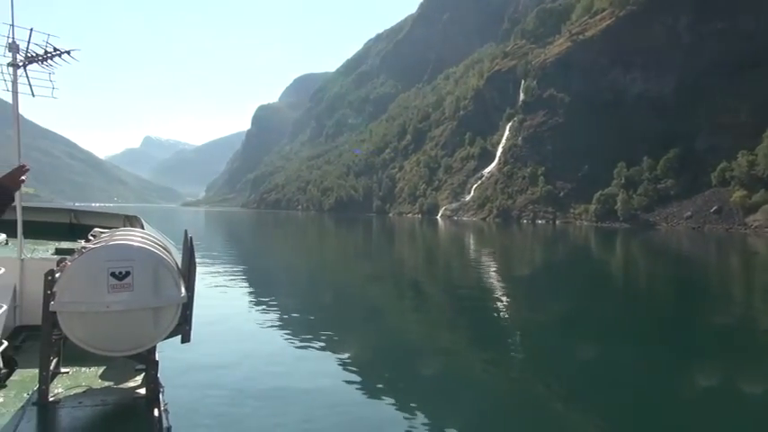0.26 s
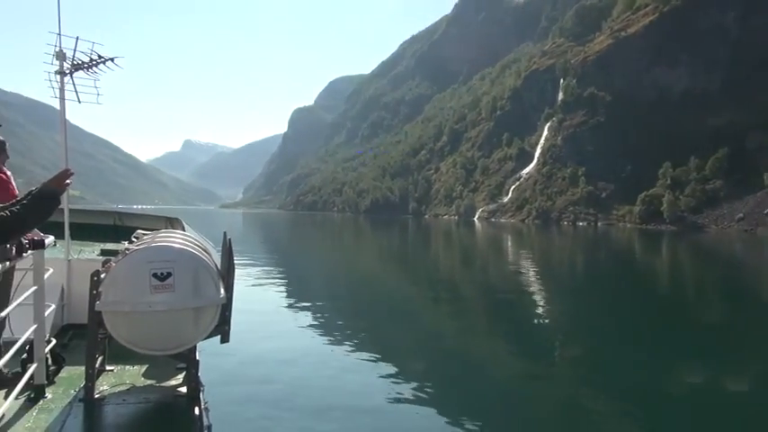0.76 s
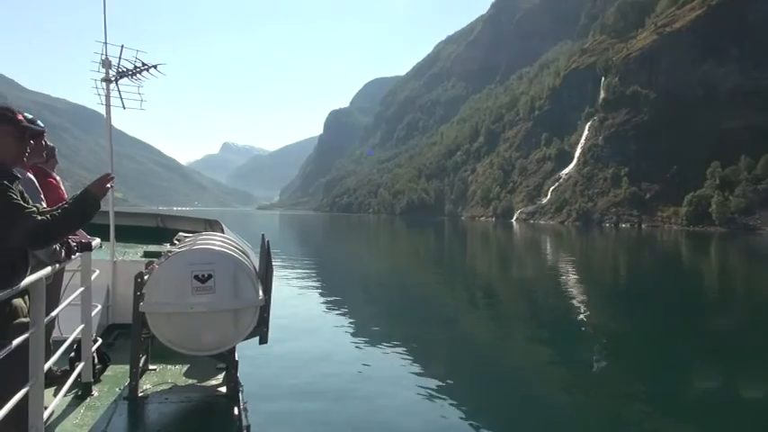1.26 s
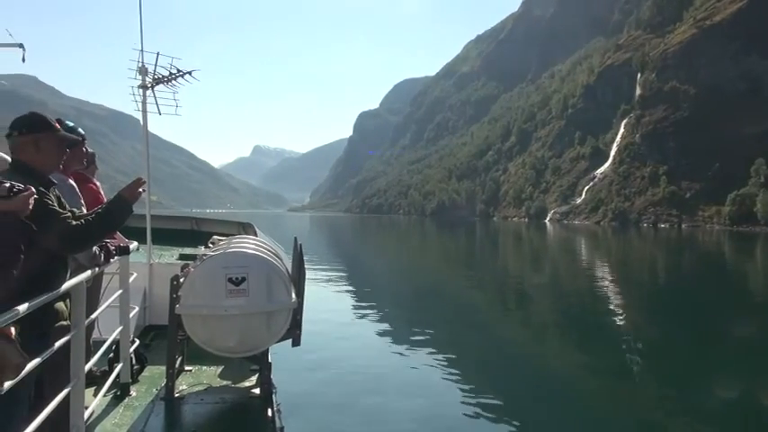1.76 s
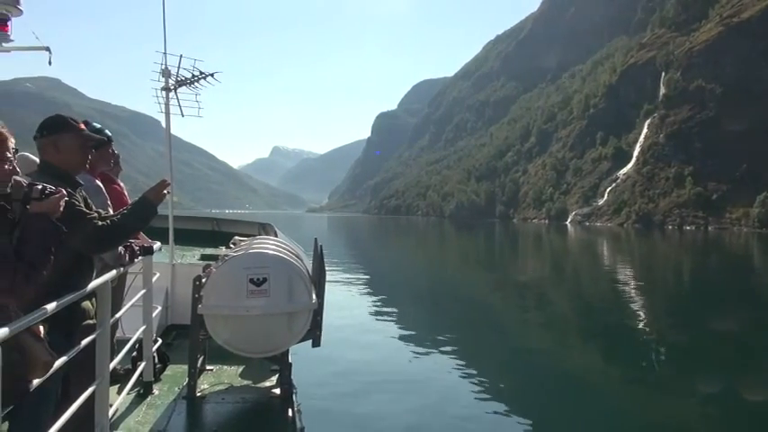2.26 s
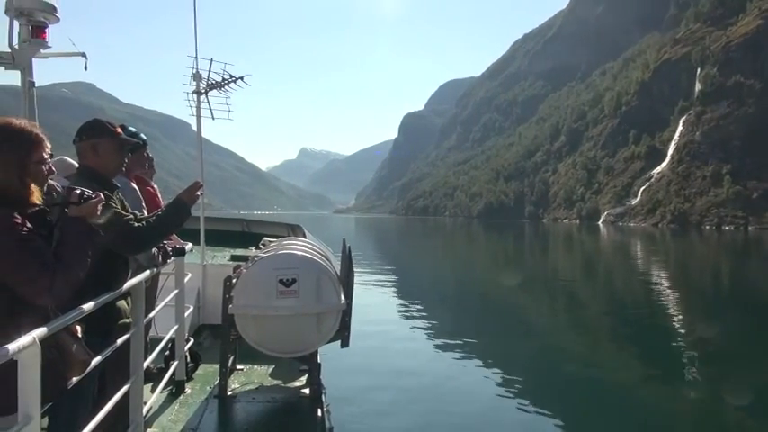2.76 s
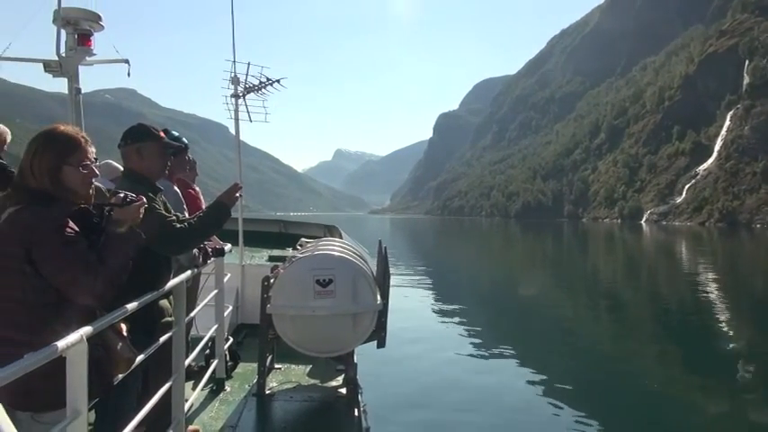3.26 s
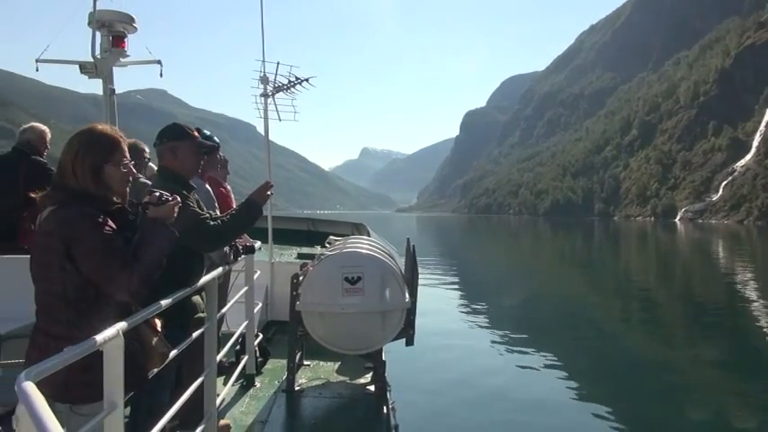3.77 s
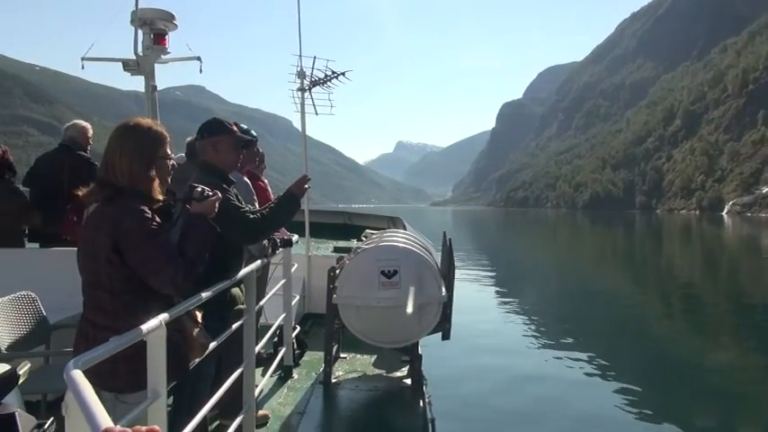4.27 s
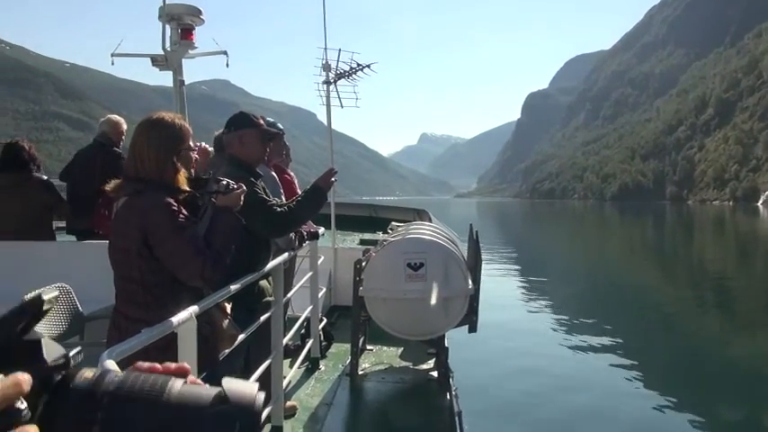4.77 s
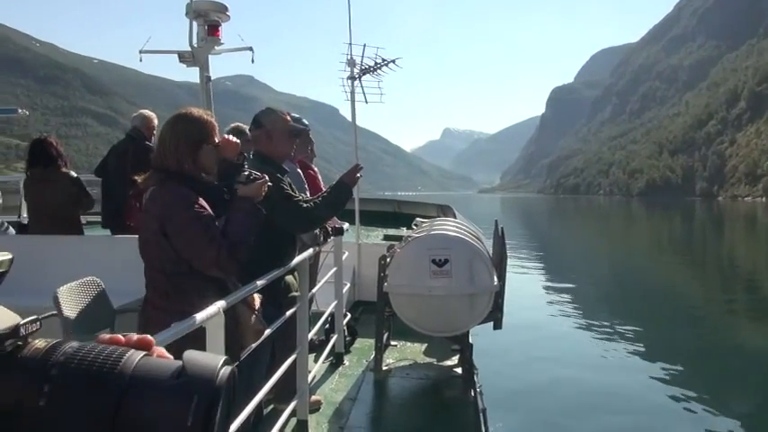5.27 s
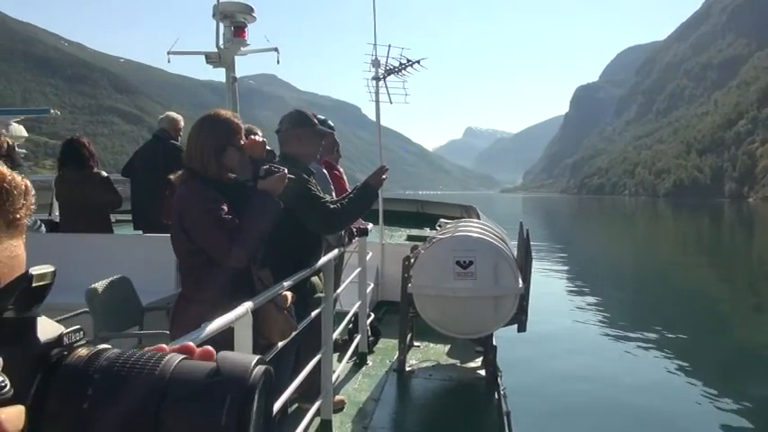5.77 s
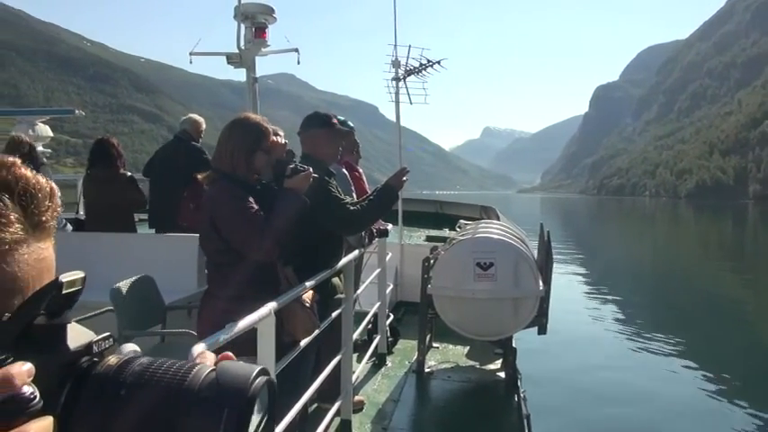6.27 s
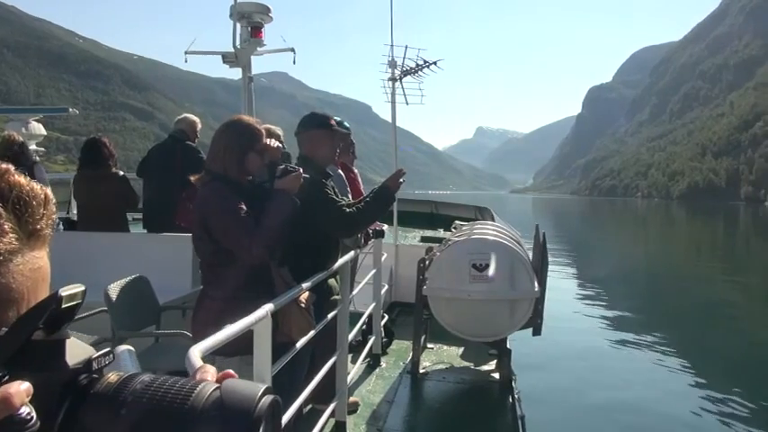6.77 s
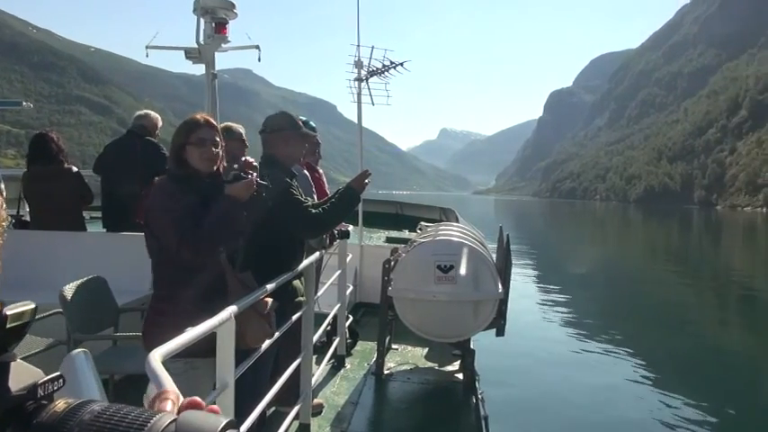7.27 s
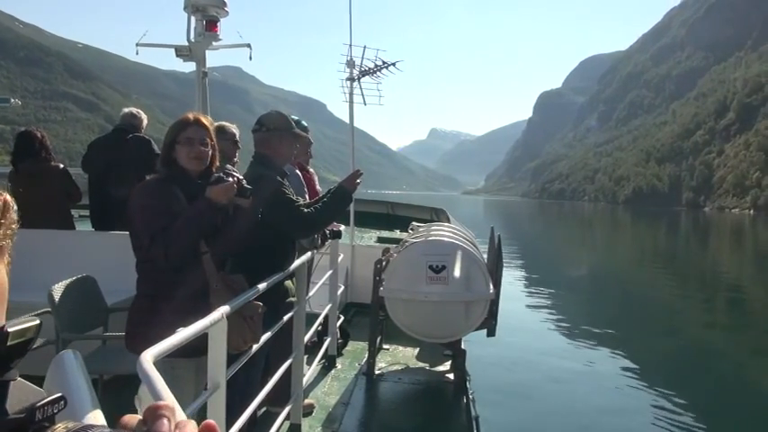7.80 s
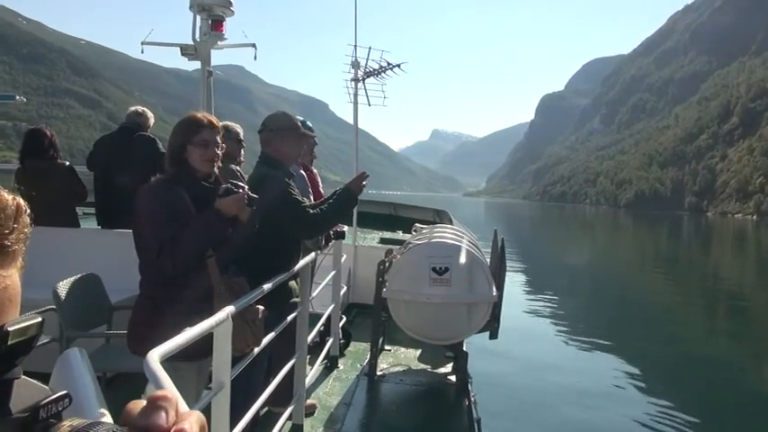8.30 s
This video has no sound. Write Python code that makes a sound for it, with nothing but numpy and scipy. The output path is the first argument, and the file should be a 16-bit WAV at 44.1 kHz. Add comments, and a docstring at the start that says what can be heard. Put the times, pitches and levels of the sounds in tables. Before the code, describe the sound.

A constant low engine hum dominates, its pitch unchanging, with rapid soft throbbing and a rough growl above. Beneath lies uneven rumble and the boom of steel deck plates. Water laps and hisses along the hull, strongest at the very start, and air pockets gurgle now and then, more often in the later part. A thin metallic buzz flickers on the left, fading past midway. Close, wide stereo pickup outdoors on deck.

```python
"""On a calm fjord, at the rail of a cruising sightseeing boat's open deck.
The diesel exhaust drones at a steady speed: tones on multiples of the shaft speed, throbbing five times a second.
Shaped noise makes the low rumble under it, and a loose fitting, rung by tiny contacts, buzzes with each turn.
The bow wave washes along the hull as noise in wavering bands, and gurgles in short rising tones."""
import sys
import numpy as np
from scipy import signal
from scipy.fft import rfft, irfft
from scipy.io import wavfile
from scipy.ndimage import uniform_filter1d, minimum_filter1d

SR = 44100
rng = np.random.default_rng(int(sys.argv[2]) if len(sys.argv) > 2 else 0)


def transcribe(u):
    """Save the signal u as a 16-bit wav file named by the first command-line argument.

    u: samples, shape (n,) or (channels, n), limited to [-1, 1]; the rate is SR.
    q: integer samples, one column per channel.
    """
    v = np.clip(np.atleast_2d(u).T, -1, 1)
    q = np.round(v * 32767).astype(np.int16)
    wavfile.write(sys.argv[1], SR, q)


N = 376610
TIME = np.arange(N) / SR
FREQS = np.maximum(np.arange(N // 2 + 1) * SR / N, 1)
SHAFT_HZ = 29.867

# balance between the two sides: (frequency [Hz], left minus right [dB])
BALANCE = [(30, .8), (60, -3), (120, 3), (150, -2), (180, 7.5), (215, 11), (290, 5), (380, 11.5),
           (490, 7.5), (760, 4.5), (1300, 6), (3000, 3.5), (6300, -3), (10000, 0)]
# phase between the two sides: (frequency [Hz], lead of the left [rad])
LEFT_LEAD = [(60, 0), (200, 0.17), (1000, 0.39), (1700, 0.77), (2400, 0.73), (3300, 0.78), (4000, 0.019),
             (8000, 0)]


def from_db(db):
    """Decibels to gain."""
    return 10 ** (np.asarray(db) / 20)


def rms_one(x):
    """Scale to unit power."""
    return x / np.sqrt(np.mean(x ** 2) + 1e-20)


def in_time(rows):
    """Each column of a curve, at every sample."""
    s, *columns = np.transpose(rows)
    return [np.interp(TIME, s, column) for column in columns]


def at_hz(points, hz):
    """Read a table on a log-frequency axis."""
    table_hz, values = np.transpose(points)
    return np.interp(np.log(hz), np.log(table_hz), values)


def drift(rate_hz):
    """Slow chance with a spread of one: noise through a two-pole lowpass, drawn every 40 samples."""
    pole = np.exp(-2 * np.pi * rate_hz * 40 / SR)
    noise = rng.standard_normal(N // 40 + 2002)
    slow = signal.lfilter([1], [1, -2 * pole, pole * pole], noise)[2000:]  # drop the settling
    return np.interp(np.arange(N) / 40, np.arange(len(slow)), rms_one(slow))


def pan(balance_db):
    """Left and right gains whose mean is one."""
    gains = from_db(np.array([[.5], [-.5]]) * balance_db)
    return gains / gains.mean(axis=0)


def resonate(x, hz, width_hz):
    """One resonance with unit gain on top."""
    r = np.exp(-np.pi * width_hz / SR)
    top = np.array([1, 0, -1]) * (1 - r * r) / 2
    return signal.lfilter(top, [1, -2 * r * np.cos(2 * np.pi * hz / SR), r * r], x)


def stereo_noise(spectrum):
    """Noise of a given density, left-right likeness set by frequency: wide from 5 to 11 kHz, nearly mono above."""
    # how alike the two sides are: (frequency [Hz], left-right likeness [-1 to 1])
    likeness = [(30, .97), (150, 0.71), (320, 0.59), (450, 0.78), (700, 1), (2000, 0.83), (4600, 0.97),
                (5500, 0.2), (8000, 0.11), (10800, 0), (11500, .99)]
    mid, side = rfft(rng.standard_normal((2, N))) * np.sqrt(SR / 4)
    alike = np.clip(at_hz(likeness, FREQS), -1, 1)
    pair = np.sqrt(1 + alike) * mid + np.sqrt(1 - alike) * side * [[1], [-1]]
    # steep fall outside the table
    low_hz, high_hz = spectrum[0][0], spectrum[-1][0] * 2
    ends = 1 / np.sqrt((1 + (low_hz / FREQS) ** 8) * (1 + (FREQS / high_hz) ** 8))
    lead = np.exp(1j * at_hz(LEFT_LEAD, FREQS) * [[.5], [-.5]])
    placing = pan(at_hz(BALANCE, FREQS)) * lead
    return irfft(pair * ends * from_db(at_hz(spectrum, FREQS)) * placing, N)


def shaft_lines(angle, orders, path, waver_db, rough):
    """Wavering tones in step with the shaft; half multiples make every second turn differ."""
    out = np.zeros((2, N))
    for multiple, db in orders:
        multiple = np.round(2 * multiple) / 2      # a four-stroke cycle takes two turns
        hz = multiple * SHAFT_HZ
        lead = at_hz(LEFT_LEAD, hz) * np.array([[.5], [-.5]])
        phase = multiple * angle - path(hz) + rough * drift(12) + lead
        level_db = db + waver_db * drift(8.4)
        out += np.sin(phase) * from_db(level_db) * pan(at_hz(BALANCE, hz))
    return np.sqrt(2) * out


def through_pipe(hz):
    """Phase lag of the exhaust pipe: tones above its resonance leave late."""
    pipe_hz, pipe_q = 150, 2.2
    return np.arctan(pipe_q * (hz / pipe_hz - pipe_hz / hz))


def through_hull(hz):
    """Phase lag of the longer path by way of the hull, which lands between two exhaust pulses."""
    delay_s = .0194
    return 2 * np.pi * hz * delay_s


def throb(uneven_db):
    """Swing of the boom in dB: a broad swell with a quicker ripple at twice its rate, a little uneven."""
    turns_per_throb = 6      # probably with the geared-down propeller
    swell_db, swell_crest_s = 0.62, .005
    ripple_db, ripple_crest_s = .5, 0.052
    rate = 2 * np.pi * SHAFT_HZ / turns_per_throb      # rad/s
    swell = swell_db * np.cos(rate * (TIME - swell_crest_s))
    ripple = ripple_db * np.cos(2 * rate * (TIME - ripple_crest_s))
    return swell + ripple + uneven_db * drift(6)


def exhaust_boom(angle):
    """The fourth order of the exhaust and its weaker neighbours throb as one deep boom."""
    # boom, easing as the microphone turns toward the deck: (time [s], level before throb and trim [dB])
    boom_curve = [(0.0, -12.5), (0.7, -14.5), (5.0, -14), (6.4, -16), (7.8, -15.5), (8.54, -17.5)]
    # exhaust tones: (multiple of the shaft speed, level re the boom [dB])
    boom_orders = [(1, -27), (2, -24), (3, -42), (4, -0.5)]
    boom_db, = in_time(boom_curve)
    lines = shaft_lines(angle, boom_orders, through_pipe, waver_db=0.15, rough=0.062)
    return from_db(boom_db + throb(uneven_db=0.04) + 0.56) * lines


def growl_level():
    """Level in dB shared by the exhaust growl and the hull, as the load wavers a little."""
    # growl of the higher orders: (time [s], level before waver and trims [dB])
    growl_curve = [(0.0, -15), (1.2, -18), (1.6, -15), (3.1, -16.5), (4.0, -14), (4.9, -14.5), (5.7, -15.5),
                   (6.1, -14.5), (6.5, -16), (7.8, -14.8), (8.54, -17.2)]
    growl_db, = in_time(growl_curve)
    return growl_db + 0.44 * drift(5.3)


def exhaust_growl(angle, growl_db):
    """Higher exhaust orders growl, flickering because no two firings are equally strong."""
    # exhaust tones: (multiple of the shaft speed, level re the growl [dB])
    growl_orders = [(5, -17), (5.5, -18), (6, -1.5), (6.5, -22), (7, -3.5)]
    stroke_db = 0.51 * drift(26)
    lines = shaft_lines(angle, growl_orders, through_pipe, waver_db=0.1, rough=0.16)
    return from_db(growl_db + stroke_db - 0.56) * lines


def hull_hum(angle, growl_db):
    """The hull plates hum on high shaft orders, delayed by the path through the hull."""
    # hum of the plates: (multiple of the shaft speed, level re the growl before a 3 dB cut [dB])
    hull_orders = [(8, -16.5), (9, -17.5), (10, -15.5), (11, -27), (14, -34.5), (16, -28.5), (18, -30),
                   (20, -29)]
    lines = shaft_lines(angle, hull_orders, through_hull, waver_db=1.83, rough=0.22)
    return from_db(growl_db - 3.0) * lines


def combustion_rumble():
    """Uneven combustion rumbles as low shaped noise."""
    # rumble before the engine is panned: (frequency [Hz], density [dB per Hz])
    rumble_spectrum = [(6, -63), (45, -58.5), (72, -53.5), (105, -43.5), (135, -46.5), (170, -44.5),
                       (225, -49), (255, -51.5), (300, -56.5), (360, -64.5), (500, -76.5)]
    return stereo_noise(rumble_spectrum)


def deck_plates(level_db):
    """The engine's rumble sets the steel deck booming: noise in one broad resonance, passed twice."""
    # resonance of the plates: (frequency [Hz], width of each pass [Hz])
    plate = (319.4, 41)
    hz, width_hz = plate
    noise = rng.standard_normal(N)
    ring = rms_one(resonate(resonate(noise, hz, width_hz), hz, width_hz))
    return ring * from_db(level_db) * pan(at_hz(BALANCE, hz))


def engine(angle):
    """Exhaust, hull and deck together, as the microphone turns slowly toward the deck."""
    # the turn: (time [s], left minus right added to the whole engine [dB], deck plate level before it [dB])
    turn_curve = [(0, 0, -38), (2, 1, -36), (4, -0.5, -34.5), (6, 0.5, -34), (8.54, 0.5, -34)]
    turn_db, plate_db = in_time(turn_curve)
    growl_db = growl_level()
    tones = exhaust_boom(angle) + exhaust_growl(angle, growl_db) + hull_hum(angle, growl_db)
    return (tones + combustion_rumble() + deck_plates(plate_db)) * pan(turn_db)


def fitting_contacts(angle, per_turn_db, per_cycle_db, uneven_db, touches_per_s, lead_ms):
    """Tiny random contacts ring the fitting, hardest once per shaft turn, every second turn harder."""
    # resonances of the fitting: (frequency [Hz], width of each pass [Hz], relative level [dB])
    modes = [(1261, 92, -4), (2060, 91, 2), (2320, 164, 4), (2540, 177, 3)]
    shake_db = per_turn_db * np.cos(angle) + per_cycle_db * np.cos(angle / 2) + uneven_db * drift(32)
    touches = (rng.random(N) < touches_per_s / SR) * rng.choice([-1, 1], N)
    clicks = touches * from_db(shake_db) + 1e-18
    ring = 0
    for hz, width_hz, db in modes:
        ring = ring + from_db(db) * resonate(resonate(clicks, hz, width_hz), hz, width_hz)
    buzz = rms_one(ring)
    # it lies to the left, so the right side hears it later
    return np.array([buzz, np.interp(TIME - lead_ms / 1000, TIME, buzz)])


def loose_fitting(angle):
    """The fitting's buzz swells and fades, with brief hard shakes, left of the microphone."""
    # buzz: (time [s], level before shakes, drift and trim [dB])
    buzz_curve = [(0.0, -38), (2.5, -36), (3.2, -35), (4.35, -35.5), (4.6, -38.5), (8.54, -38.5)]
    # its hardest shakes: (time [s], extra level at the crest [dB])
    shakes = [(.333, 8), (.66, 8.5), (1.47, 4.5), (2.06, 11.5), (2.67, 6.5), (3.14, 8), (3.47, 2),
              (6.42, 9.5)]
    buzz_db, = in_time(buzz_curve)
    shakes_db = sum(db * np.exp(-.5 * ((TIME - s) / 0.005) ** 2) for s, db in shakes)
    level_db = buzz_db + shakes_db + .5 * drift(3.7) + 0.56
    buzz = fitting_contacts(angle, per_turn_db=4.0, per_cycle_db=1.5, uneven_db=1.5,
                            touches_per_s=1200, lead_ms=0.11)
    return buzz * from_db(level_db) * pan(balance_db=3.0)


def wave_levels():
    """Wash, splash and spray in dB; the splash follows the wash in part and fades as we turn from the water."""
    # bow wave, only the swing about each mean is used: (time [s], wash level [dB], spray level [dB])
    wave_curve = [(0.0, -25, -35.5), (0.3, -29, -37), (0.9, -28, -37), (1.6, -28.5, -37),
                  (2.05, -30.5, -39), (2.8, -29.5, -37.5), (3.25, -30.5, -37), (3.7, -27.5, -37),
                  (4.15, -27.5, -36), (4.9, -29.5, -37.5), (5.5, -29, -37.5), (6.1, -29.5, -37.5),
                  (6.9, -29.5, -38.5), (7.15, -27.5, -38), (7.8, -29, -38.5), (8.3, -30.5, -39.5),
                  (8.54, -29.5, -39)]
    splash_follows, splash_fade_db_per_s = .6, 0.28
    wash_db, spray_db = in_time(wave_curve)
    splash_db = splash_follows * wash_db - splash_fade_db_per_s * TIME
    return wash_db, splash_db, spray_db


def bow_wave(wash_db, splash_db, spray_db, lap_db, fizz_db):
    """Wash and splash lap in patches of pitch; the spray above them is a fine hiss that flickers faster."""
    # water on the hull, before swings and patches: (frequency [Hz], density [dB per Hz])
    wash_spectrum = [(330, -57.5), (480, -56), (590, -59.5), (700, -57.5), (1080, -65), (1500, -65),
                     (2100, -69), (3000, -71), (4400, -74), (6400, -77), (8700, -86), (10700, -87.5),
                     (12000, -87), (15000, -92)]
    rest, out = stereo_noise(wash_spectrum), 0
    for edge_hz in [420, 540, 700, 900, 1150, 1500, 1900, 3000, 4200, 6000, 8500, 11500]:
        lowpass = signal.butter(4, edge_hz, fs=SR, output="sos")
        band = signal.sosfiltfilt(lowpass, rest)
        rest = rest - band      # what lies above is left for the next bands
        level_db = wash_db if edge_hz < 1000 else splash_db if edge_hz < 2000 else spray_db
        patch_db = lap_db * drift(8) if edge_hz < 2000 else fizz_db * drift(25)
        out = out + band * from_db(level_db - level_db.mean() + patch_db)
    return out + rest * from_db(spray_db - spray_db.mean() + fizz_db * drift(27))


def gurgles(wander, rise_per_s):
    """Pockets of air folded under by the wave ring briefly, wobbling and rising in pitch."""
    # single gurgles: (time of the crest [s], pitch there before wobble [Hz], level [dB], spread [s])
    pockets = [(0.917, 980, -38, 0.058), (1.194, 452, -33, 0.05), (1.38, 495, -31.5, 0.034),
               (2.93, 756, -35, 0.024), (5.091, 620, -32, 0.042), (6.151, 410, -35, 0.046),
               (6.298, 337.3, -28.5, .03), (6.42, 462, -37, 0.06), (6.73, 816, -35, .04),
               (7.326, 936, -39, 0.062), (7.41, 536, -35, 0.033), (7.72, 845, -39, .07)]
    out, wobble = np.zeros((2, N)), wander * drift(22.7)
    for s, hz, db, spread_s in pockets:
        near = np.abs(TIME - s) < 4 * spread_s
        age = TIME[near] - s
        pitch_hz = hz * (1 + wobble[near] + rise_per_s * age)
        ring = np.sqrt(2) * np.sin(2 * np.pi * np.cumsum(pitch_hz) / SR)
        swell = np.exp(-.5 * (age / spread_s) ** 2)
        out[:, near] += ring * swell * from_db(db) * pan(at_hz(BALANCE, hz))
    return out


def scene():
    """Engine, fitting and water together at the rail."""
    first_cycle_s = .06      # the first full four-stroke cycle begins here
    # the governor holds the speed closely: the angle wanders by a small fraction of a turn
    angle = 2 * np.pi * SHAFT_HZ * (TIME - first_cycle_s) + 0.047 * drift(2.3)
    water = bow_wave(*wave_levels(), lap_db=1.65, fizz_db=1.5) + gurgles(wander=.025, rise_per_s=0.247)
    return engine(angle) + loose_fitting(angle) + water


def record(dry):
    """A fast limiter holds the highest crests under full scale; then the top is cut steeply."""
    cutoff_hz = 15300
    room = np.minimum(1, .99 / (np.abs(dry).max(axis=0) + 1e-9))
    gain = uniform_filter1d(minimum_filter1d(room, size=441), size=441)      # 10 ms windows
    return irfft(rfft(dry * gain) / np.sqrt(1 + (FREQS / cutoff_hz) ** 800), N)


dry = scene()
out = record(dry)
transcribe(out)
```